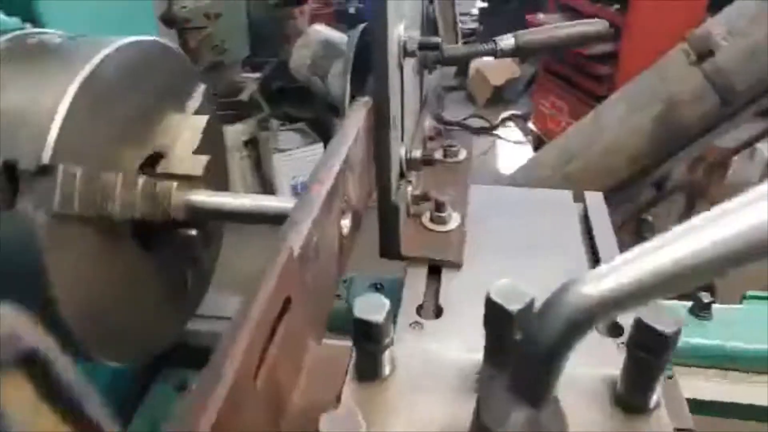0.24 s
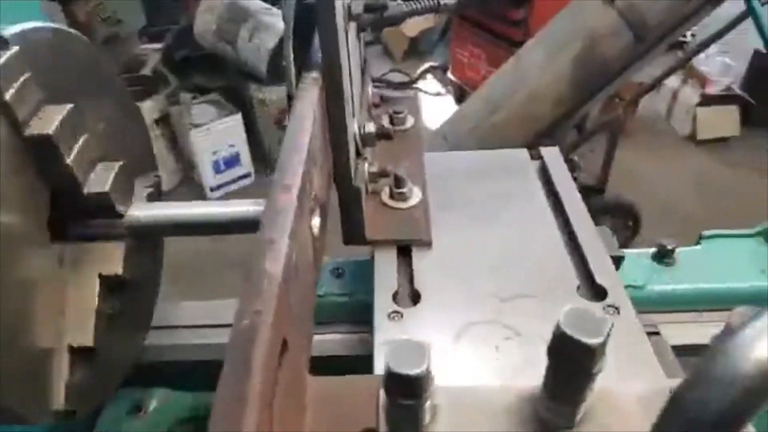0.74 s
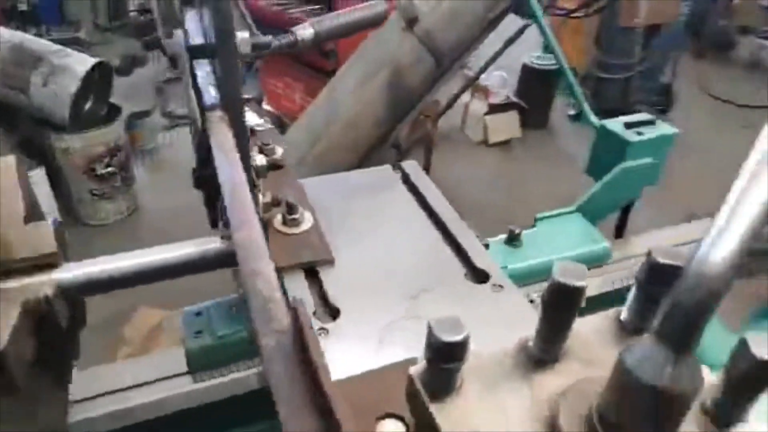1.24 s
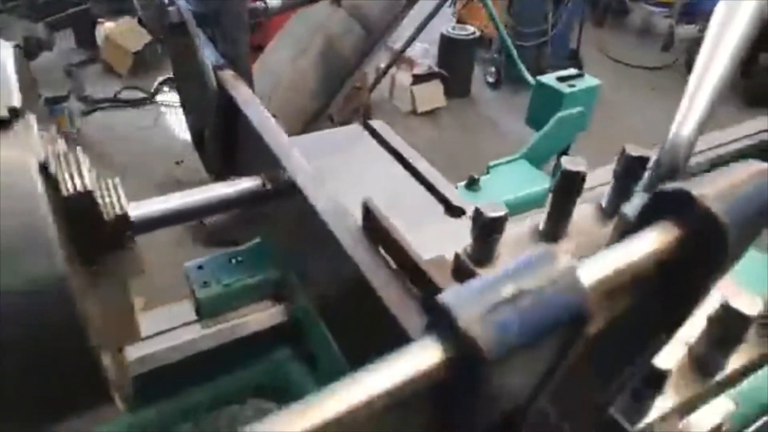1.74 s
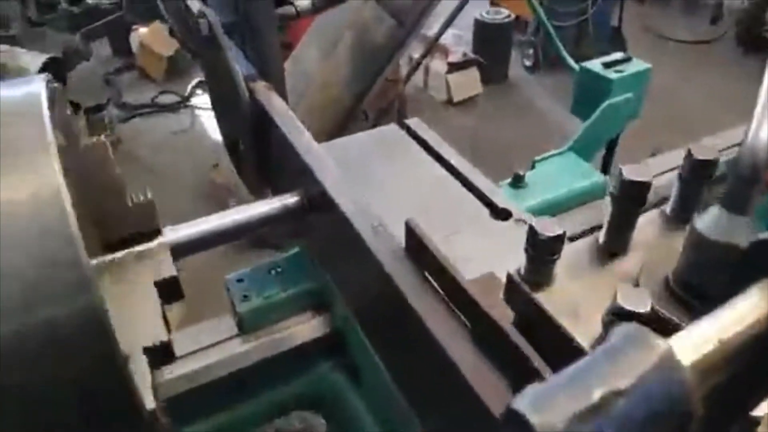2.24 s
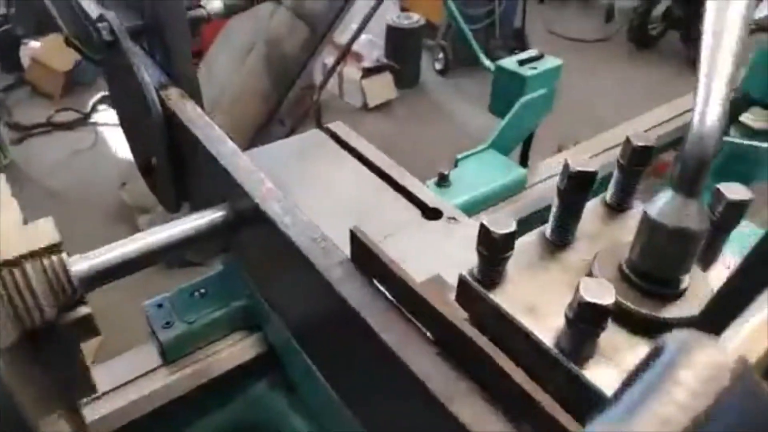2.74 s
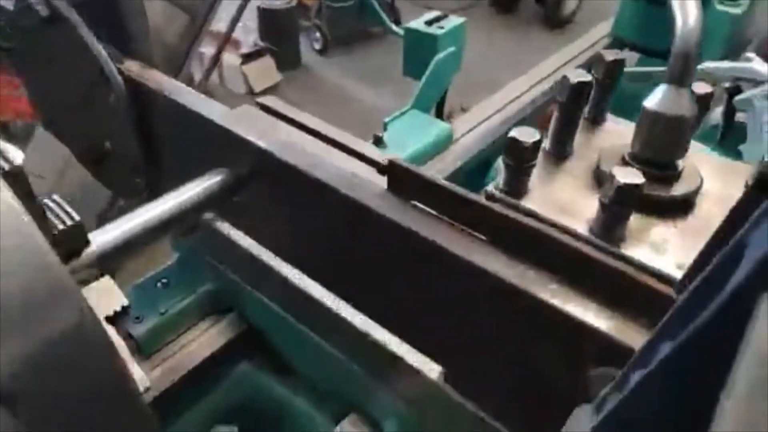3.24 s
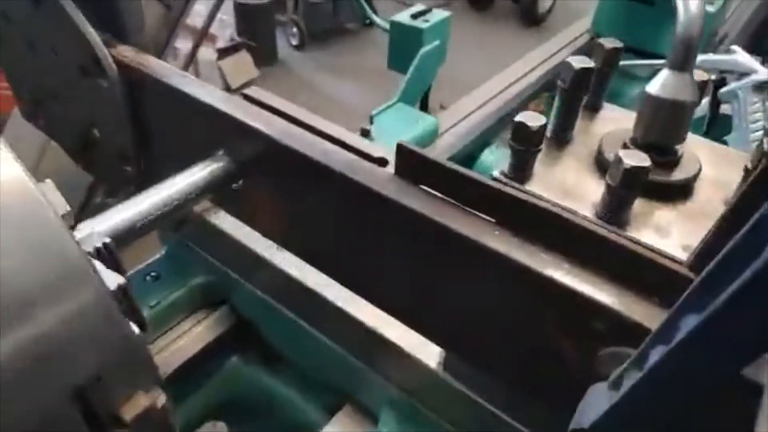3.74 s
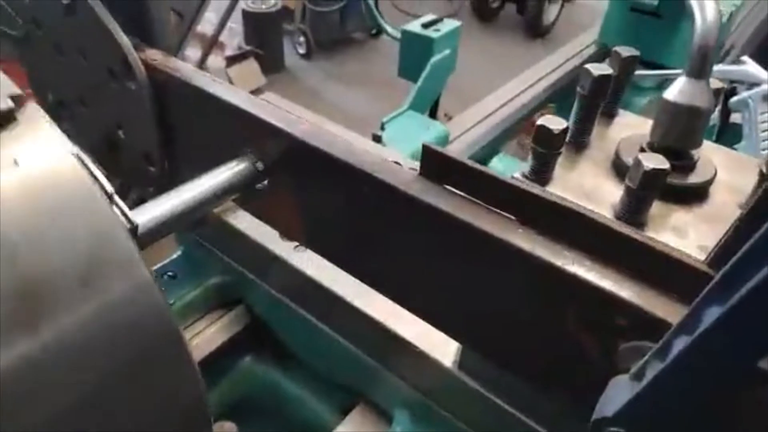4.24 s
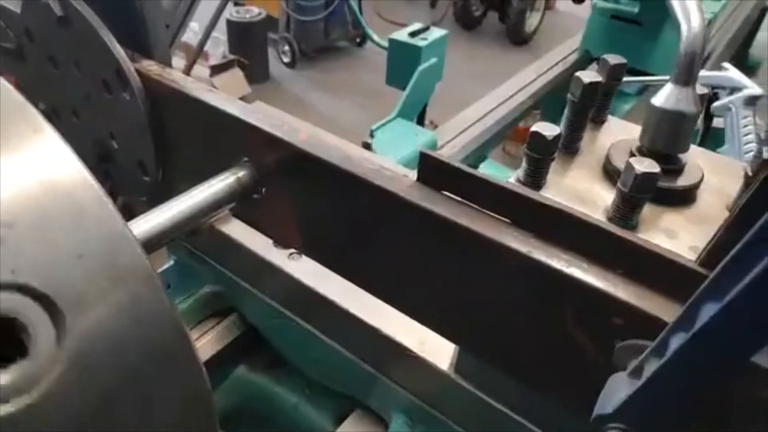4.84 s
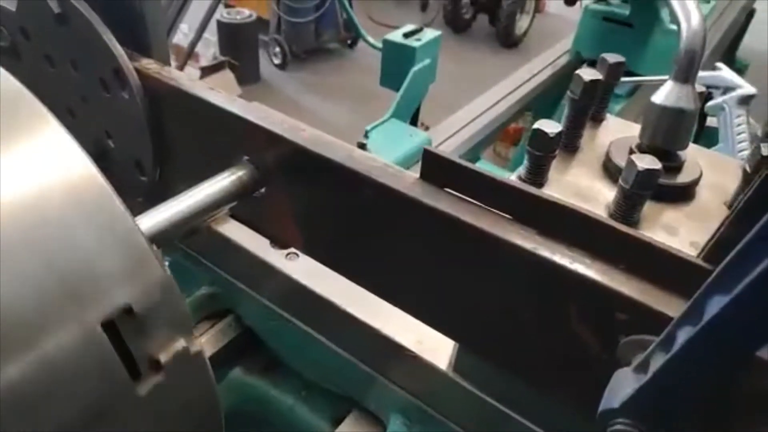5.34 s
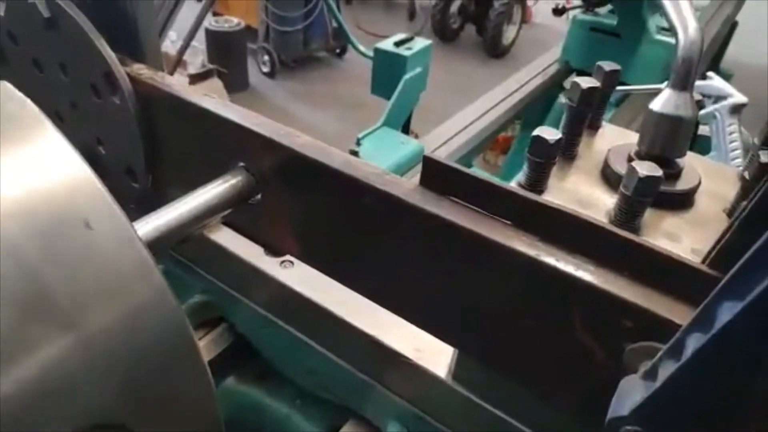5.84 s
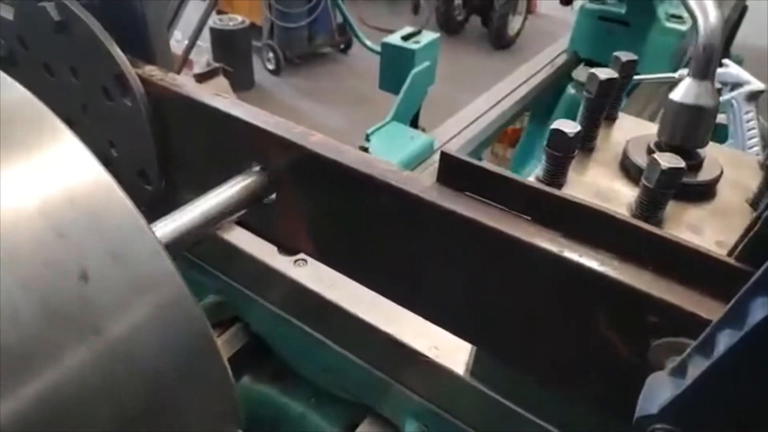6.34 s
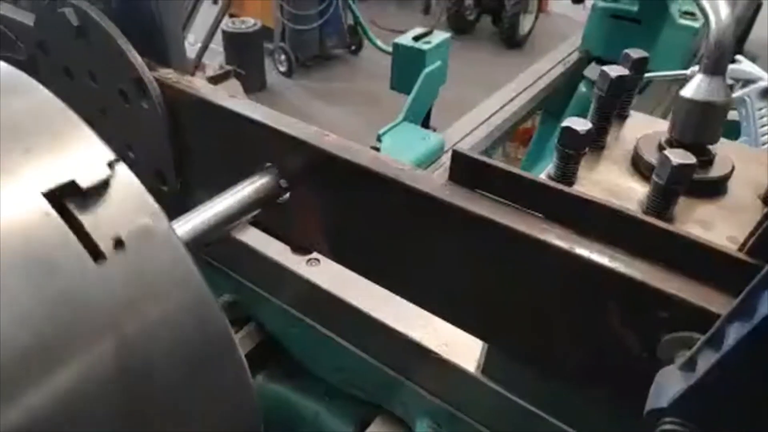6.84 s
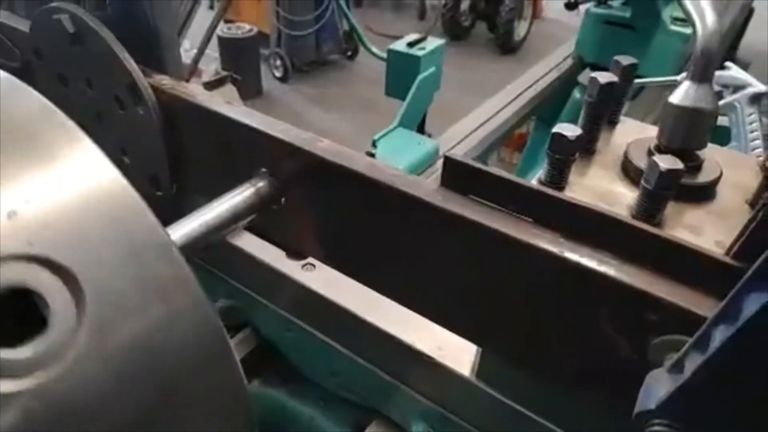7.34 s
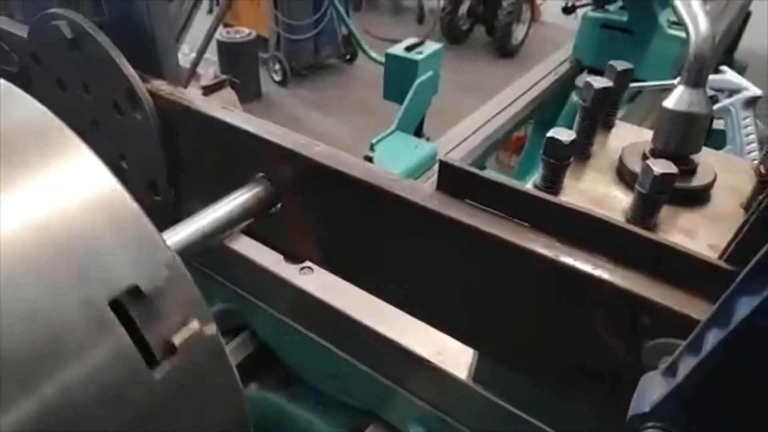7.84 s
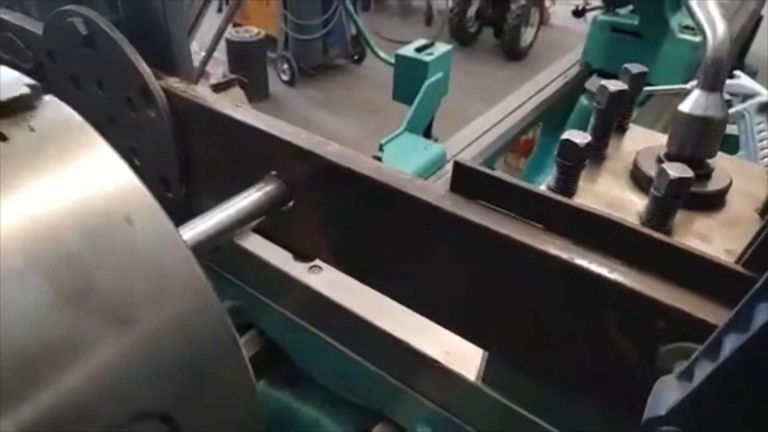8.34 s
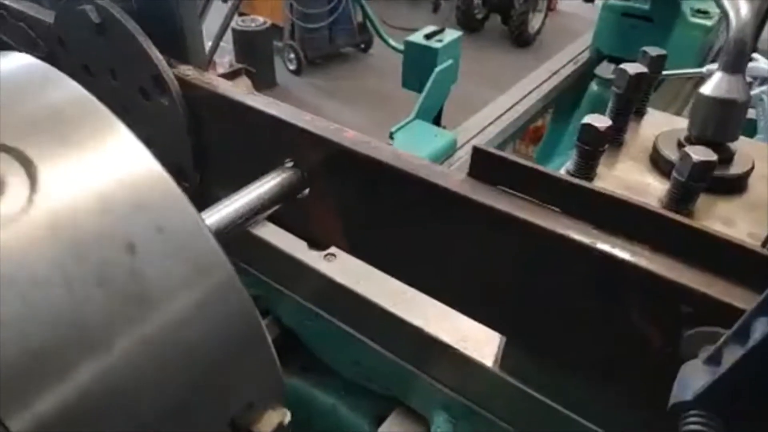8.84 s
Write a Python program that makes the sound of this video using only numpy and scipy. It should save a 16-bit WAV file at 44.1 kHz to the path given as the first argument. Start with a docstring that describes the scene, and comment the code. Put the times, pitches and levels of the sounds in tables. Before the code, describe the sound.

Pressurised spray hisses in two long bursts over a slowly turning lathe, whose faint whine comes through in the gap between them.

```python
"""Pressurised spray beside a lathe

A turbulent jet hisses in two long bursts and roars where it strikes metal. Between the bursts the
hiss dies away in the room, uncovering shop noise and the whine of a slowly turning lathe: harmonics of
the gear mesh rate, modulated once a shaft turn. A rumble and a few soft bloops lie beneath. The mostly
diffuse field reaches the two ports of a hand-held phone, whose noise suppressor mutes weak bands."""
import sys
import numpy as np
from scipy import signal
from scipy.fft import rfft, irfft, next_fast_len
from scipy.io import wavfile
from scipy.ndimage import uniform_filter1d, map_coordinates

SR = 44100
rng = np.random.default_rng(int(sys.argv[2]) if len(sys.argv) > 2 else 0)


def transcribe(u):
    """Save the signal u as a 16-bit wav file named by the first command-line argument.

    u: samples, shape (n,) or (channels, n), limited to [-1, 1]; the rate is SR.
    q: integer samples, one column per channel.
    """
    v = np.clip(np.atleast_2d(u).T, -1, 1)
    q = np.round(v * 32767).astype(np.int16)
    wavfile.write(sys.argv[1], SR, q)


N = 400428
TIME = np.arange(N) / SR
SIDE = np.array([[.5], [-.5]])  # splits a balance (left minus right level) between the ports


def amp(db):
    """Amplitude ratio of a level in dB."""
    return 10 ** (np.asarray(db) / 20)


def unit(x):
    """Normalisation to an rms of 1."""
    return x / np.sqrt(np.mean(x ** 2) + 1e-20)


def along(points, hz):
    """Interpolation of (f, value) points on a logarithmic frequency axis."""
    f, values = np.transpose(points)
    return np.interp(np.log(hz + 1), np.log(f + 1), values)


def curves(rows):
    """Linear interpolation in time: one curve for each column after the first."""
    times, *columns = np.transpose(rows)
    return [np.interp(TIME, times, column) for column in columns]


def wobble(rate):
    """Slow random modulation: a spline through `rate` Gaussian knots a second."""
    steps = np.arange(0, N + 64, 64)
    knots = rng.standard_normal(int(N * rate / SR) + 4)
    return np.interp(np.arange(N), steps, map_coordinates(knots, [steps * rate / SR]))


def filtered(x, response):
    """Linear filtering: the spectrum is multiplied by a frequency response."""
    size = next_fast_len(N + 8192)
    return irfft(rfft(x, size) * response(np.fft.rfftfreq(size, 1 / SR)), size)[..., :N]


def lowpass(x, corner_hz, order):
    """Zero-phase low-pass filtering, falling 6 dB an octave per order."""
    return filtered(x, lambda hz: 1 / (1 + (hz / corner_hz) ** order))


def smoothed(field, bins, frames):
    """Moving average over frequency, then over time."""
    return uniform_filter1d(uniform_filter1d(field, bins, axis=-2), frames, axis=-1)


def noise_field(coherence, lag_ms, patchy_db, size, kept=1, scatter=0, smooth_hz=30000, hollow_db=0):
    """Partial coherence: diffuse noise at each port plus direct noise, lag_ms later at the left."""
    hz, t, white = signal.stft(rng.standard_normal((3, N), dtype=np.float32), SR, nperseg=1024)
    hz, at = hz[:, None], np.minimum(t * SR, N - 1).astype(int)
    patches, shifts = unit(smoothed(rng.standard_normal((2, *white.shape[1:])), *size))
    lag_s, kept = np.broadcast_to(lag_ms, N)[at] / 1000, np.broadcast_to(kept, N)[at]
    share = np.clip(along(coherence, hz) * kept * np.exp(scatter * shifts - scatter ** 2 / 2), 0, .97)
    delay = np.exp(-1j * np.pi * hz * lag_s)
    pair = np.sqrt(1 - share) * white[:2] + np.sqrt(share) * white[2] * np.array([delay, delay.conj()])
    # narrow, shifting hollows open where a random field exceeds 1.3 standard deviations
    hollows = np.maximum(unit(smoothed(rng.standard_normal(white.shape[1:]), 3, 6)) - 1.3, 0)
    gain = amp(patchy_db * patches / (1 + (hz / smooth_hz) ** 2))
    gain *= amp(hollow_db * hollows / (1 + (hz / smooth_hz) ** 8))
    return signal.istft(pair * gain, nperseg=1024)[1][:, :N]


# Strength of the low noise: t/s, hum and handling level/dB, murk level/dB
RUMBLE_LEVELS = [(0.0, -46, -42.5), (0.25, -48, -38), (0.6, -47.5, -47), (0.88, -57.5, -45),
                 (2.3, -65, -49), (2.8, -67.5, -55.5), (4.3, -68, -54), (5.28, -62, -44),
                 (6.15, -65.5, -46), (7.1, -58.5, -40.5), (7.36, -63.5, -38), (8.88, -65, -43)]
# Spectral density of the hum: f/Hz, relative level/dB
HUM_SPECTRUM = [(25, -35), (65, -22), (135, -8.5), (195, 2.5), (269, -4), (300, -17), (350, -4.5),
                (460, -32), (770, -120)]
# Spectral density of the murk: f/Hz, relative level/dB
MURK_SPECTRUM = [(200, -65.5), (340, -24.5), (418, -14.5), (605, -8.5), (783, -5.5), (868, -7.5), (950, 2),
                 (1240, -20), (2090, -120)]


def rumble():
    """Band-limited noise: a hum, nearly coherent at the ports, under a patchy, diffuse, murky band."""
    hum_db, murk_db = curves(RUMBLE_LEVELS)
    hum = noise_field([(200, 0.88)], lag_ms=.1, patchy_db=2, size=(2, 5))
    hum = filtered(hum, lambda hz: amp(along(HUM_SPECTRUM, hz)))
    murk = noise_field([(600, 0.23)], lag_ms=0.28, patchy_db=5, size=(2, 9))
    murk = filtered(murk, lambda hz: amp(along(MURK_SPECTRUM, hz)))
    return amp(hum_db - 1.6 * SIDE) * unit(hum) + amp(murk_db) * unit(murk)


# Soft low bloops: t/s, level/dB (about 7 dB under the envelope's crest), f/Hz, balance/dB
BLOOP_EVENTS = [(0.128, -47, 204, 3.5), (0.591, -42, 208, 2.5), (1.139, -51, 228, 2), (3.01, -54, 239, -3),
                (5.56, -48, 787, 11), (6.599, -47.5, 670, -10), (7.577, -38.5, 664, -2)]


def bloops():
    """Damped oscillation: three inharmonic partials swell and fade within a tenth of a second."""
    out, t = np.zeros((2, N + SR)), np.arange(SR // 5) / SR
    envelope = (t / 0.0059) * np.exp(1 - t / 0.013)
    partials = (1, 1), (1.4, 0.5), (0.59, 0.171)  # frequency ratio, amplitude
    for start, db, hz, balance_db in BLOOP_EVENTS:
        tone = sum(gain * np.sin(2 * np.pi * ratio * hz * t) for ratio, gain in partials)
        out[:, round(start * SR):][:, :len(t)] += amp(db + SIDE * balance_db) * envelope * tone
    return out[:, :N]


# Spectral density of the shop noise: f/Hz, relative level/dB
SHOP_SPECTRUM = [(40, -71), (180, -29.5), (300, -12.5), (800, -17), (1350, -13), (2000, -19), (2600, -3),
                 (3100, -27), (5000, -34.5), (7500, -35.5), (9500, -68)]
# Its level difference between the ports: f/Hz, balance/dB
SHOP_BALANCE = [(300, -2.5), (1100, -9.5), (1700, 8), (2600, 12), (3800, -2.5), (5200, -8), (7000, -9.5),
                (9000, -2.5)]
# Headstock resonances: f/Hz, bandwidth/Hz, level/dB, balance/dB
CASING_MODES = [(1063, 68, -49, 0), (2386, 280, -55.5, 9.5), (2635, 43, -63, 12), (3130, 160, -68, 14.5),
                (4250, 70, -76.5, -7)]
# Casing modes and gear tones sink under the spray and shift between the ports:
# t/s, left gain of the lowest mode and tone/dB, their right gain/dB, gain of the rest/dB
LATHE_GAINS = [(0, 0.5, 1, -30.5), (1.5, -1.5, -20, 1.5), (2.45, -6.5, -24, -2), (2.55, -25.5, -5, -5.5),
               (2.9, -30.5, -13, 4), (2.94, -30, 3, 2), (3.8, -30, 0, -0.5), (3.95, -12.5, -0.5, -3),
               (4.25, -4, -2, 0.5), (4.4, -19, 2, -1), (4.5, -26.5, 1.5, 1), (4.56, -8, -3.5, -12),
               (7, -12, -6, -14)]


def shop_noise():
    """Forced resonance: gear noise drives the headstock casing's modes, over steady machine noise."""
    air = noise_field([(1000, 0.16)], lag_ms=0.53, patchy_db=5, size=(3, 7), hollow_db=-28)
    air = filtered(air, lambda hz: amp(along(SHOP_SPECTRUM, hz) + SIDE * along(SHOP_BALANCE, hz)))
    gears = noise_field([(1000, .22)], lag_ms=0.18, patchy_db=3, size=(3, 5))
    *lowest_db, upper_db = curves(LATHE_GAINS)
    out = amp(-50.5) * unit(air)
    for k, (hz, width, db, balance_db) in enumerate(CASING_MODES):
        mode = filtered(gears, lambda f: (1j * f * width / (hz ** 2 - f ** 2 + 1j * f * width)) ** 2)
        gain_db = upper_db if k else np.array(lowest_db)
        out += amp(db + SIDE * balance_db + gain_db) * unit(mode)
    return out


# Gear tones: harmonic numbers of the mesh rate
HARMONICS = [2, 3, 4, 5, 7, 8]
# Per harmonic, before LATHE_GAINS: left early and late level/dB, right early and late level/dB,
# start and end of the change t/s, flicker scale/dB
HARMONIC_LEVELS = [(-37, -38, -37, -34.5, 3.2, 4.7, 4.5), (-37, -44.5, -66.5, -66, 3.9, 3.94, 2),
                   (-33.5, -49, -51.5, -45.5, 2.52, 4.5, -0.5), (-73, -47, -79, -69, 3.5, 4, 4),
                   (-83.5, -82, -72.5, -51, 3.2, 3.8, 5), (-86.5, -91, -71, -58, 3.5, 3.5, 2)]
# Per harmonic: least throb depth at the right port, throb weight, roughness, loss between spurts/dB
HARMONIC_MODULATION = [(0, .2, .14, 0), (0, 1, .25, 0), (.6, 1.2, .2, 0), (0, .5, .4, 0), (0, .3, .35, 5),
                       (0, .3, .5, 16)]
# Spurts of the highest tones: start t/s, end t/s
SPURT_TIMES = [(3.8, 3.87), (4.0, 4.3), (4.37, 4.55)]
# Growth of the once-a-turn throb: t/s, modulation depth before weighting
THROB_DEPTH = [(3.6, .15), (3.9, .6)]
MESH_HZ, SHAFT_HZ = 558.5, 14.4


def gear_whine():
    """Amplitude modulation: uneven tooth loading makes the mesh harmonics throb once a shaft turn."""
    mesh_phase = 2 * np.pi * np.cumsum(MESH_HZ + 0.66 * wobble(8.4)) / SR
    depth = np.clip(curves(THROB_DEPTH)[0], 0, 1)
    *lowest_db, upper_db = curves(LATHE_GAINS)
    shaft = np.cos(2 * np.pi * SHAFT_HZ * (TIME - 3.81) + .6 * wobble(3))
    spurting = sum(1. * (TIME > start) * (TIME < end) for start, end in SPURT_TIMES)
    lull = 1 - uniform_filter1d(spurting, size=900)
    out = np.zeros((2, N))
    for k, levels, modulation in zip(HARMONICS, HARMONIC_LEVELS, HARMONIC_MODULATION):
        *port_db, start, end, flicker_db = levels
        least, weight, rough, lull_db = modulation
        for port in (0, 1):
            db = np.interp(TIME, [start, end], port_db[2 * port:2 * port + 2]) - lull_db * lull
            db += lowest_db[port] if k == HARMONICS[0] else upper_db
            throb = 1 + np.maximum(port * least, weight * depth) * shaft
            drift = 0.5 * wobble(30) + rough * wobble(90) + port * k * 1.29  # rad; the two paths differ
            roughness = 1 + rough * wobble(80)
            flicker = flicker_db * np.minimum(.6 * wobble(45) + wobble(12), .5)
            out[port] += throb * roughness * amp(db + flicker) * np.sin(k * mesh_phase + drift)
    return out


# Spray bursts: valve opens t/s, valve shuts t/s
VALVE_TIMES = [(-1, 2.475), (4.517, 9.5)]
# Onset of lower hiss, upper hiss, roar, fizz and edge: time constant/s
RISE_TIMES = [.013, .013, .018, .013, .028]
# Their tails: first drop/dB, fade/(dB/s), delay until the tail is cut off/s, added fade/(dB/s)
TAIL_DECAY = [(-5.5, -62, 0.41, -210), (-2.5, -97, .34, -300), (-2, -40, 0.45, -100),
              (-11, -88.5, .33, -400), (-3, -51.5, 0.38, -100)]


def burst_envelopes():
    """Reverberant decay: each band rises quickly and, once the valve shuts, dies away, treble first."""
    drop_db, fade_rate, cutoff_s, cutoff_rate = np.transpose(TAIL_DECAY)[:, :, None]
    gain = 0
    for opens, shuts in VALVE_TIMES:
        since_open, since_shut = np.maximum(TIME - opens, 0), np.maximum(TIME - shuts, 0)
        rise = (1 - np.exp(-since_open / np.array(RISE_TIMES)[:, None])) ** 4
        decay_db = drop_db * (1 - np.exp(-since_shut / .06)) + fade_rate * since_shut
        decay_db += cutoff_rate * np.maximum(since_shut - cutoff_s, 0)
        gain = gain + rise * amp(decay_db)
    return gain


# Spectral density of the jet before its bands are levelled: f/Hz, relative level/dB
JET_SPECTRUM = [(500, -46.5), (850, -26), (915, -30), (1010, -8.5), (1270, -9), (1420, -7.5), (1590, -9),
                (2320, -7.5), (3470, -3.5), (6890, 6), (9240, 1.5), (10100, -9.5), (14500, -12.5),
                (15800, -16)]
# Its level difference between the ports: f/Hz, balance/dB
JET_BALANCE = [(500, -1.5), (1100, -5), (1750, 3), (2700, 3), (3800, 0.2), (5200, -0.9), (7000, -6),
               (8800, -2), (10000, 0), (15000, 3.5)]
# Direct sound of the jet: f/Hz, nominal share of the power
JET_COHERENCE = [(500, 0), (1200, 0.49), (1900, 0.08), (3400, 0.1), (4200, .3), (6000, 0.05), (15000, 0.16)]
# The phone swings round, then rests: t/s, left port lag/ms, factor on the direct share, edge balance/dB
PHONE_HEADING = [(0, 0.19, 0.1, 2), (0.8, 0.44, .45, 4), (1.5, 0.054, 0.54, 6), (2.3, -0.44, 0.5, 5.5),
                 (3, 0.41, 0.6, 3), (9.08, 0.44, 1.03, 2.5)]
# A band of the roar that swells and sinks: t/s, level/dB re the roar
ROAR_SWELL = [(0, -7.5), (0.7, -12.5), (1.1, -12), (2.4, -20), (4.6, -21.5), (6.5, -29), (7.4, -15.5),
              (9.08, -14)]
# Spectral tilt of the jet's low edge: t/s, level of its bottom/dB re its top
EDGE_TILT = [(0.8, 5.5), (1.2, 13.5), (1.7, -5), (4.7, 3), (5.0, 5), (5.3, -7.5), (7.3, -1.5)]
BODY_TOP_HZ, EDGE_TOP_HZ, ROAR_TOP_HZ, UPPER_HISS_HZ, FIZZ_FROM_HZ = 1460, 2096, 3400, 8150, 9860
SWELL_HZ, SWELL_WIDTH_HZ = 2180, 570


def jet_bands():
    """Turbulence radiates broadband noise, split here into two hisses, roar, fizz and a low edge."""
    lag_ms, kept, edge_balance_db = curves(PHONE_HEADING)
    noise = noise_field(JET_COHERENCE, lag_ms, patchy_db=3, size=(2, 7), kept=kept,
                        scatter=1.3, smooth_hz=5920, hollow_db=-28)
    noise = filtered(noise, lambda hz: amp(along(JET_SPECTRUM, hz) + SIDE * along(JET_BALANCE, hz)))
    edge = lowpass(noise, EDGE_TOP_HZ, order=12)
    roar = lowpass(noise - edge, ROAR_TOP_HZ, order=6)
    fizz = filtered(noise, lambda hz: hz > FIZZ_FROM_HZ)
    hiss = unit(noise - edge - roar - fizz)
    upper_hiss = filtered(hiss, lambda hz: 1 / (1 + (UPPER_HISS_HZ / (hz + 1)) ** 12))
    swell = filtered(roar, lambda hz: 1 / (1 + ((hz - SWELL_HZ) / (SWELL_WIDTH_HZ / 2)) ** 4))
    roar = unit(roar) + amp(curves(ROAR_SWELL)[0]) * unit(swell)
    body = lowpass(edge, BODY_TOP_HZ, order=10)
    tilt = amp(curves(EDGE_TILT)[0] / 2)
    edge = (tilt * body + (edge - body) / tilt) / np.std(edge)
    return hiss - upper_hiss, upper_hiss, roar, unit(fizz), amp(SIDE * edge_balance_db) * edge


# The jet with the valve open: t/s, hiss gain/dB, roar level/dB re the hiss
JET_FLOW = [(0, -24, -8.5), (0.8, -23.5, -10), (1.12, -23.5, -7), (1.5, -21, -11), (1.95, -20.5, -11.5),
            (2.2, -20.5, -10), (2.46, -19.5, -9.5), (4.55, -19, -4.5), (4.7, -20, -4), (4.88, -21, -2.5),
            (5.05, -20, -3), (5.2, -19, -6.5), (5.55, -21, -5.5), (5.8, -21, -6), (6.2, -18, -8.5),
            (6.52, -19, -10.5), (6.64, -19, -7), (6.76, -20, -6), (7.15, -20, -8), (7.32, -20, -6.5),
            (7.42, -18.5, -6.5), (7.7, -18.5, -7.5), (7.85, -19, -5.5), (8.15, -18.5, -5),
            (8.6, -18.5, -5.5), (9.08, -19, -3.5)]
# Surges of the hiss: full strength t/s, gain/dB, rise constant/s, hold/s, decay constant/s
HISS_SURGES = [(1.219, 3, .03, .02, 0.088), (1.657, 3, 0.055, 0.033, .25), (5.111, 3, 0.045, 0.044, 0.12),
               (6.798, 3, .008, .1, 0.065), (7.414, 2, 0.027, 0.12, .04), (8.29, 1.5, .03, .02, .1)]


def spray():
    """Jet noise follows the flow: the hiss surges and flutters, and the jet roars on striking metal."""
    bands = jet_bands()
    flutter_db = 0.5 * wobble(9.9) + 0.4 * wobble(40)
    flow_db, impact_db = curves(JET_FLOW)
    surge_db = sum(db * np.exp(np.minimum(TIME - at, 0) / rise - np.maximum(TIME - at - hold, 0) / decay)
                   for at, db, rise, hold, decay in HISS_SURGES)
    hiss_db, roar_db = flow_db + surge_db, flow_db + impact_db
    fizz_db = flow_db - 7 + 0.57 * surge_db + 0.58 * wobble(6)
    edge_db = -36.5 + 1.5 * (roar_db + 29)  # the low edge swings wider than the roar
    levels = hiss_db, hiss_db, roar_db, fizz_db, edge_db
    jet = sum(amp(db) * gain * band for db, gain, band in zip(levels, burst_envelopes(), bands))
    return np.sqrt(2) * amp(flutter_db) * jet


def scene():
    """Superposition of all sources at the two ports."""
    return spray() + gear_whine() + shop_noise() + rumble() + bloops()


# Suppressor threshold, first term: f/Hz, level/dB re the total level
GATE_THRESHOLD = [(100, -67), (350, -58.5), (450, -87), (880, -44), (980, -39), (1300, -37.5), (1450, -53),
                  (3500, -65.5), (9000, -83.5)]
# Second term, active in loud noise: f/Hz, level/dB re the band's own slow level
DIP_THRESHOLD = [(100, -7), (350, -1), (900, -1), (1400, -1.2), (1900, -1.8), (2300, -3.5), (3500, -2.8),
                 (6000, -7), (10000, -5)]


def noise_suppressor(x, floor_db, slope, loud_db):
    """Spectral gating: each port mutes bands far under the total level or dipping under their own."""
    hz, _, spectrum = signal.stft(x.astype(np.float32), SR, nperseg=1024, noverlap=640)
    power = np.abs(spectrum) ** 2
    band = np.abs(smoothed(power, bins=2, frames=9)) + 1e-16
    total = np.abs(uniform_filter1d(power.sum(1).mean(0), size=9, origin=4))
    log_band = uniform_filter1d(np.log(band), size=9, axis=1)
    centred, trailing = [uniform_filter1d(log_band, size=41, axis=2, origin=back) for back in (0, 20)]
    slow = np.exp(np.minimum(centred, trailing))
    active = total / (total + amp(2 * loud_db))
    threshold = total * amp(2 * along(GATE_THRESHOLD, hz))[:, None]
    threshold = threshold + active * slow * amp(2 * along(DIP_THRESHOLD, hz))[:, None]
    shortfall = np.minimum(threshold / band, 100) ** slope
    gain = amp(floor_db) + (1 - amp(floor_db)) / (1 + shortfall)
    return signal.istft(spectrum * gain, SR, nperseg=1024, noverlap=640)[1][:, :N]


def record(dry):
    """The phone's signal chain: noise suppression, clipping at full scale and band limiting."""
    gated = noise_suppressor(dry, floor_db=-30, slope=6, loud_db=-30)
    return filtered(np.clip(gated, -1, 1), lambda hz: hz < 15930)


dry = scene()
out = record(dry)
transcribe(out)
```